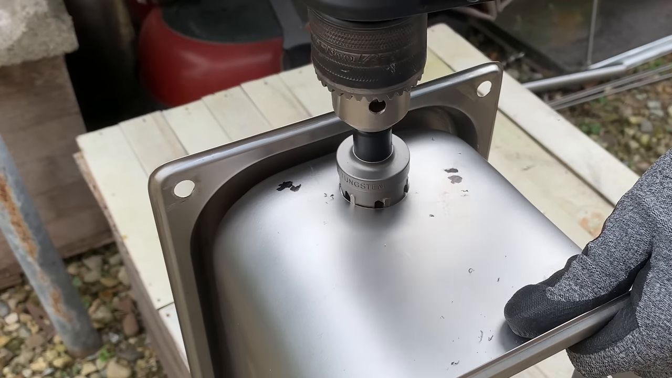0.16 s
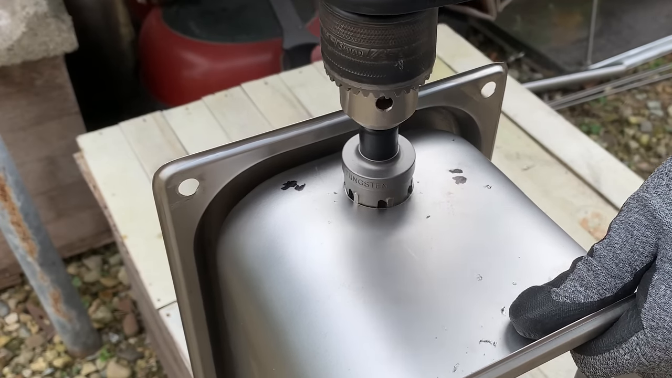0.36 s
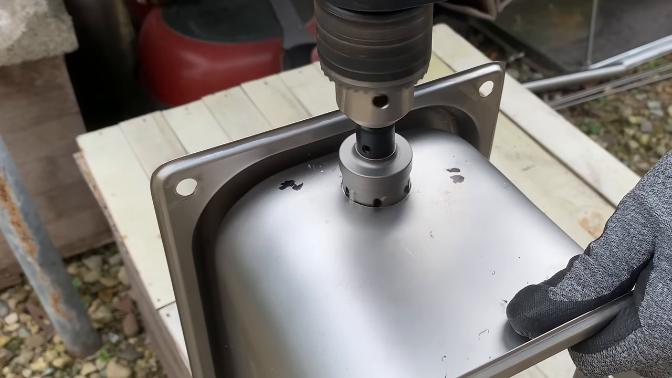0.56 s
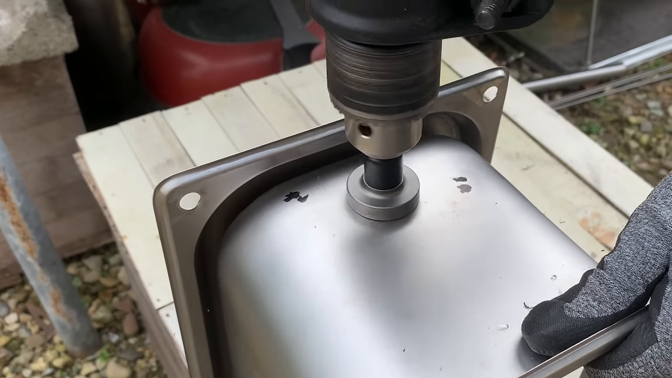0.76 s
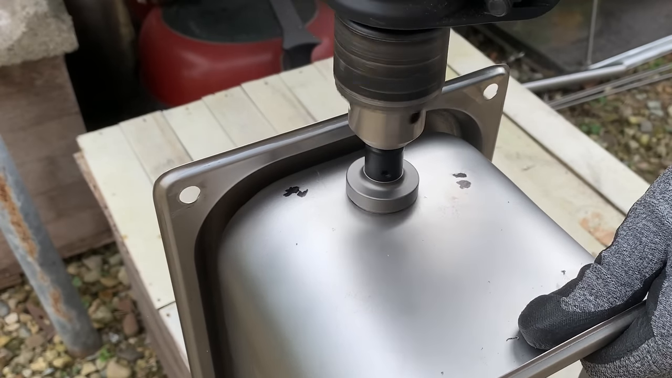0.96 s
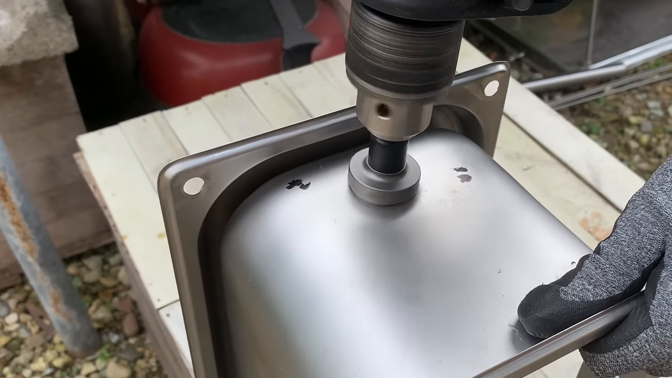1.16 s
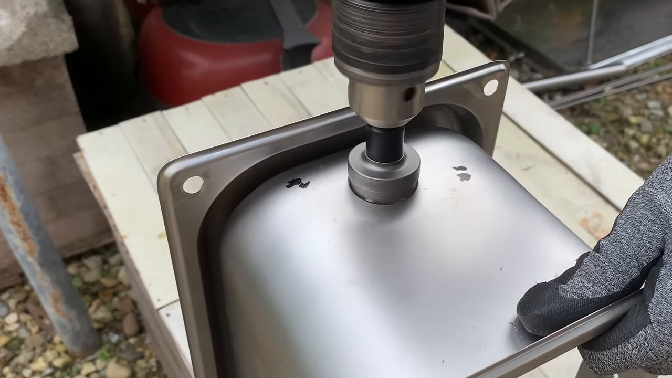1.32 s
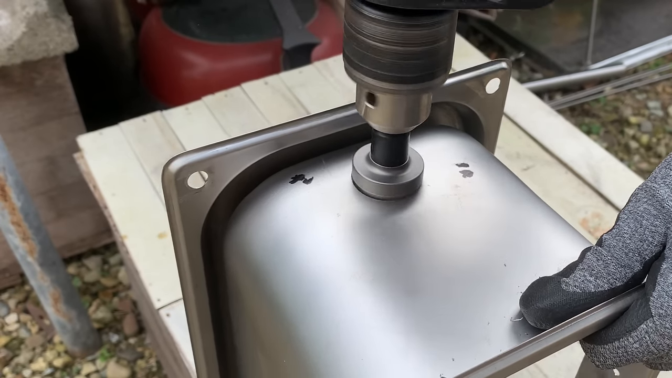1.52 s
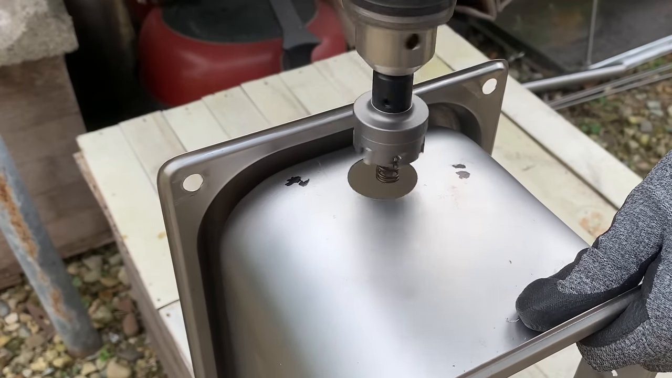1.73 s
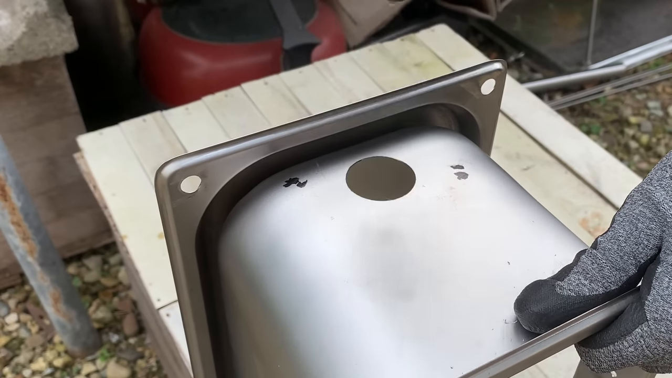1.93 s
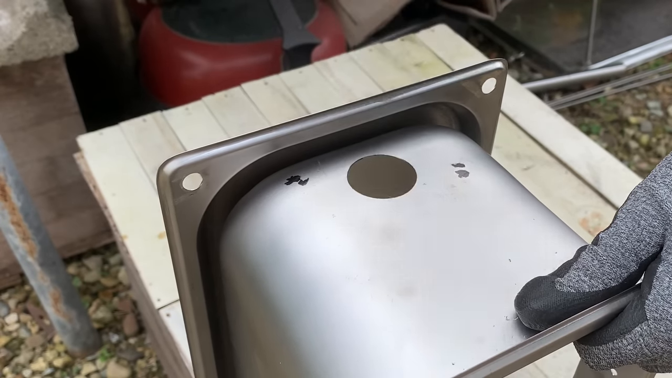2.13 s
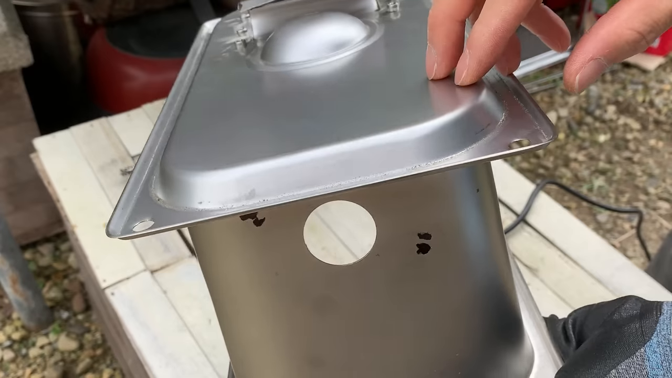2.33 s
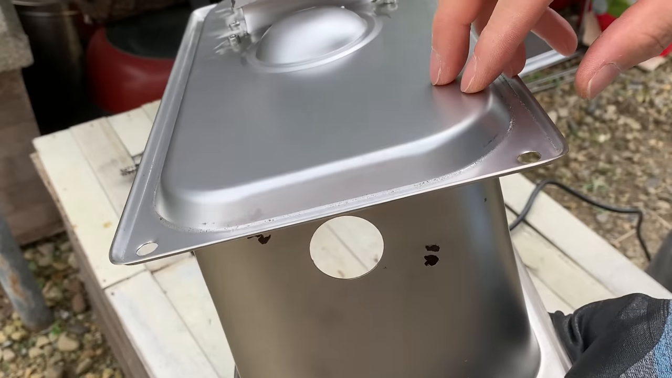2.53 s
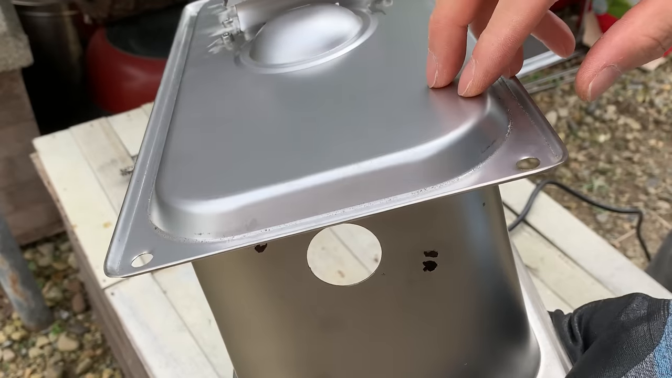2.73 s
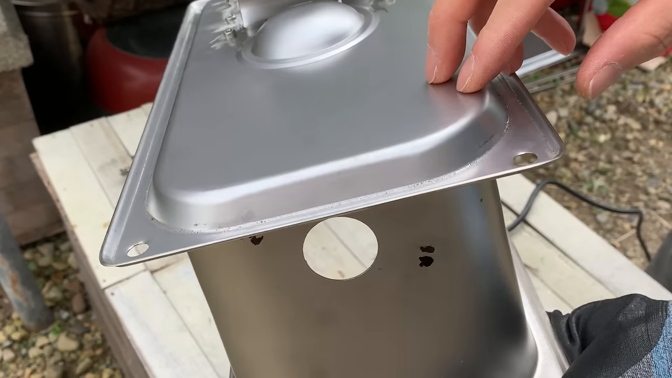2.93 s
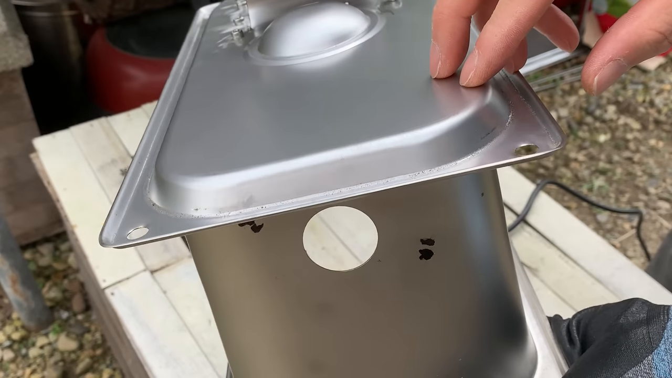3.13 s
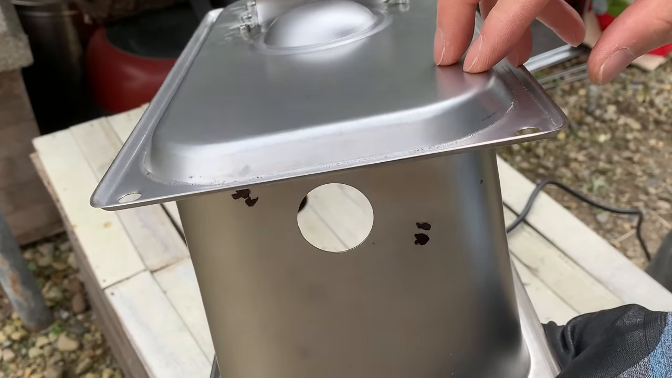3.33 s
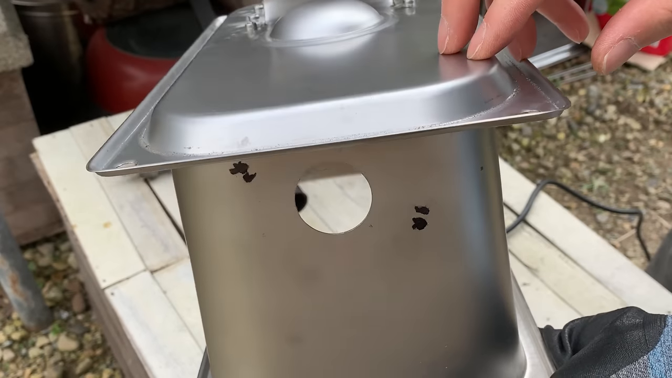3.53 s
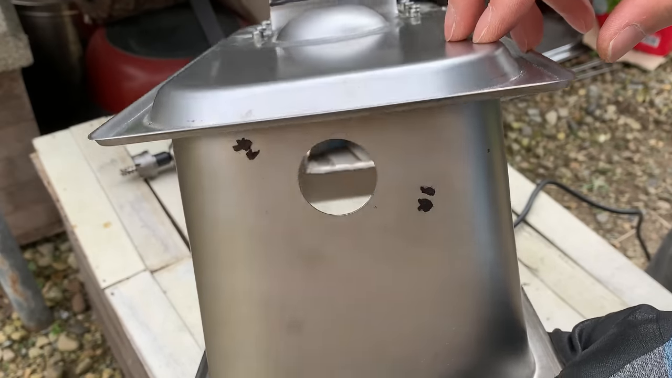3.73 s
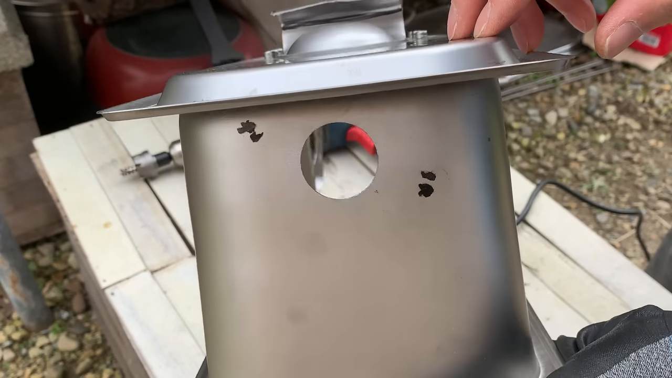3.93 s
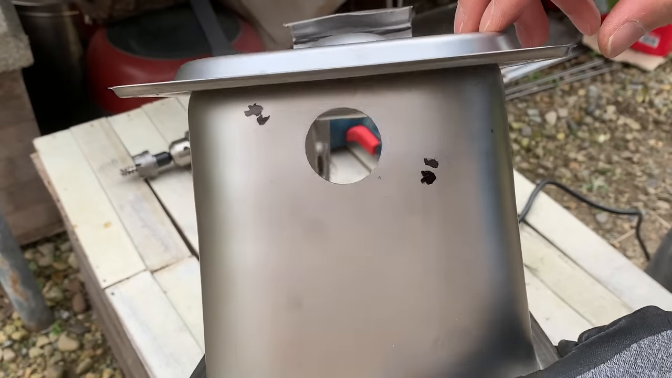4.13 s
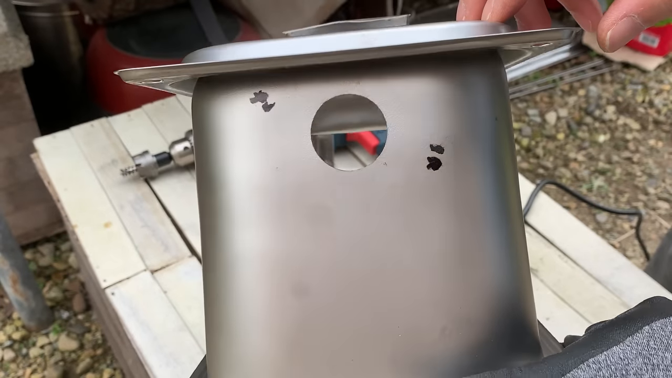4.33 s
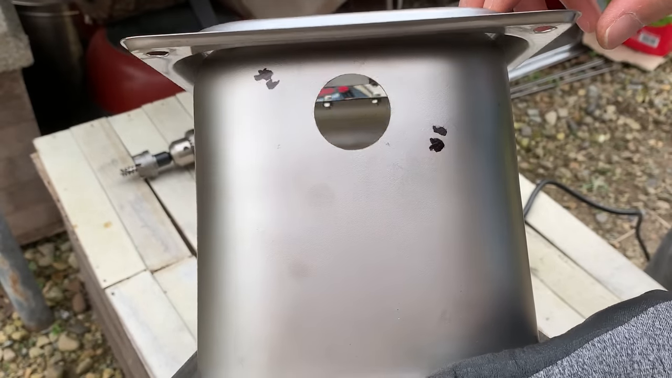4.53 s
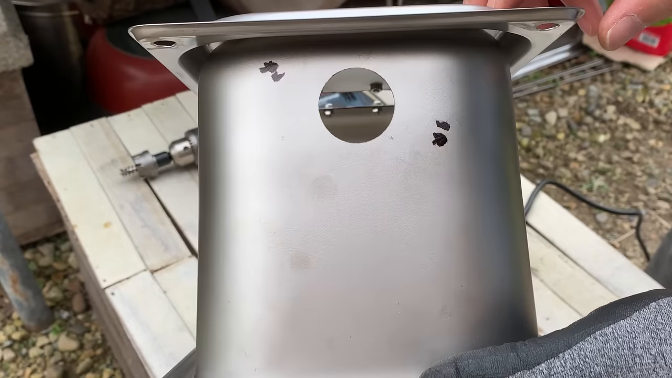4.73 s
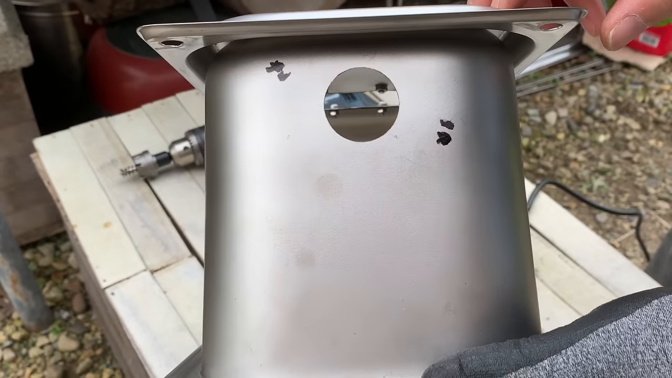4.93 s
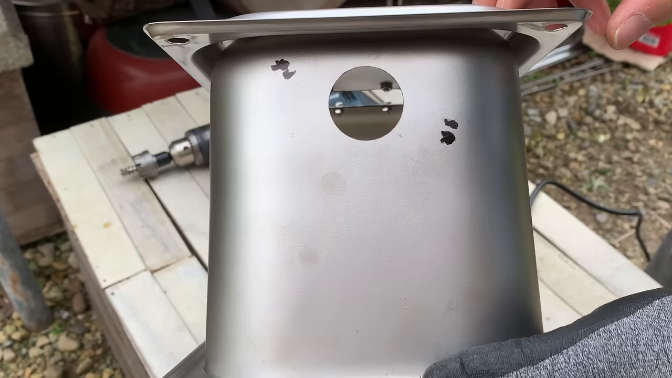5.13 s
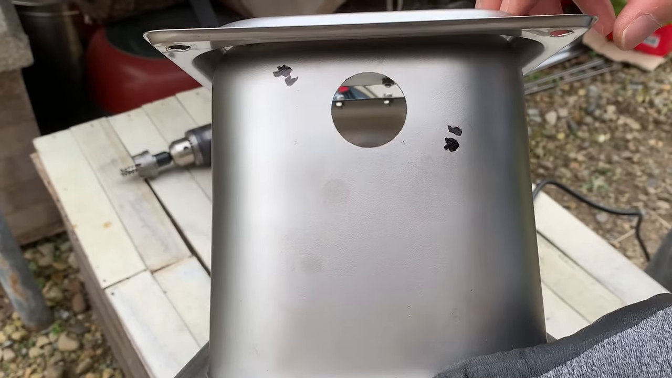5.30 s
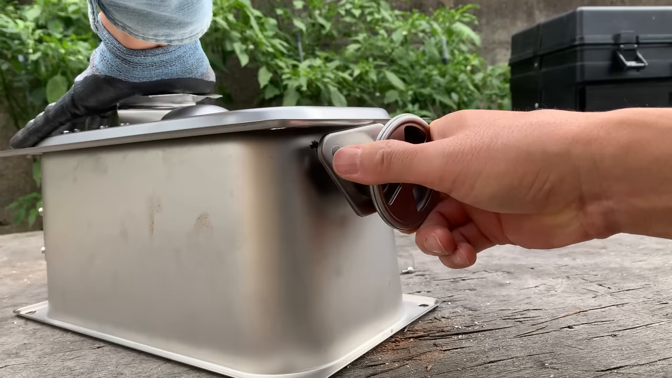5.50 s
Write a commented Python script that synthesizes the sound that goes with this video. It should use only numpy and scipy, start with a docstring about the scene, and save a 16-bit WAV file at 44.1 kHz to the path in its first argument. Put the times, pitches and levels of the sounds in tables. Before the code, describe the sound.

Harsh drill cutting of a sheet-metal pan with ringing tooth bites, an abrupt cut to faint birdsong and wind, and a late metal clank.

```python
"""A hole saw bites and chatters through the thin steel wall of an upturned pan, breaks through, spins in the
hole and is pulled out while the motor runs down; a jump to a quiet yard has birds, hum, wind and a last knock.
Random tooth contacts shake sheet resonances and scrape as coloured grains; the motor is hiss, gliding tones and
a housing resonance. The yard is coloured noise, the hum a narrow resonance, the birds gliding sines, the wind
low noise with decaying sine puffs; the fitting strikes the modes of the free-standing pan."""
import sys
import numpy as np
from scipy import signal
from scipy.fft import rfft, irfft
from scipy.io import wavfile

SR = 44100
rng = np.random.default_rng(int(sys.argv[2]) if len(sys.argv) > 2 else 0)


def convert_level_to_amplitude(level_db):
    """Map a level in decibels to its linear amplitude factor."""
    exponent = np.asarray(level_db, float) / 20
    return 10 ** exponent


def int16_out(signal):
    """Quantize to a 16-bit WAV file."""
    q = np.round(np.clip(np.atleast_2d(signal).T, -1, 1) * 32767)
    wavfile.write(sys.argv[1], SR, q.astype(np.int16))


N = 245195


def rms_one(x):
    """Scale to unit rms."""
    return x / np.sqrt(np.mean(x ** 2) + 1e-20)


def in_time(rows):
    """Read table columns as curves over time, one value a sample."""
    s, *columns = np.transpose(rows)
    return [np.interp(np.arange(N) / SR, s, column) for column in columns]


def at_hz(points):
    """Read a (frequency, value) table on the FFT grid, along a log frequency axis."""
    hz, value = np.transpose(points)
    return np.interp(np.log(np.fft.rfftfreq(N, 1 / SR) + 1), np.log(hz + 1), value)


def colour(x, spectrum):
    """Filter by a spectrum; rms 1."""
    return rms_one(irfft(rfft(x) * convert_level_to_amplitude(at_hz(spectrum)), N))


def filtered(x, order, hz, kind):
    """Butterworth filter."""
    return signal.sosfilt(signal.butter(order, hz, kind, fs=SR, output="sos"), x)


def drift(rate_hz):
    """Slow random wander of rms 1: noise through a two-pole lowpass."""
    r = np.exp(-2 * np.pi * rate_hz / SR)
    noise = rng.standard_normal(N + SR)
    settled = signal.lfilter([1], [1, -2 * r, r * r], noise)[SR:]
    return rms_one(settled)


def resonance(x, hz, width_hz):
    """Two-pole resonance with gain 1 on top."""
    r = np.exp(-np.pi * width_hz / SR)
    poles = [1, -2 * r * np.cos(2 * np.pi * hz / SR), r * r]
    return signal.lfilter([(1 - r * r) / 2, 0, (r * r - 1) / 2], poles, x + 1e-18)


def bursts(rows, rise_s):
    """Envelope of (time [s], level [dB], t60 [s]) events: quick rise, exponential fall."""
    t, out = np.arange(N) / SR, np.zeros(N)
    for s, level_db, t60 in rows:
        age = np.maximum(t - s, 0)
        fall = convert_level_to_amplitude(level_db - 60 * np.minimum(age / t60, 3))
        out += fall * (1 - np.exp(-age / rise_s))
    return out


def grains(per_s, spread_db):
    """Random clicks of uneven size and either sign; rms 1."""
    sizes = convert_level_to_amplitude(spread_db * np.minimum(rng.exponential(1, N), 5)) * rng.choice([-1, 1], N)
    return rms_one(sizes * (rng.random(N) < per_s / SR))


def patchy(x, patchy_db):
    """Each half octave swells on its own."""
    half_octave = 2 * np.log2(np.fft.rfftfreq(N, 1 / SR) / 300 + 0.0011)
    half_octave, spectrum = np.clip(half_octave, 0, 11), rfft(x)
    out = np.zeros(N)
    for k in range(12):
        band = irfft(spectrum * np.clip(1 - abs(half_octave - k), 0, 1), N)
        out += convert_level_to_amplitude(patchy_db * drift(17)) * band
    return out


def echoes(x, t60, dry_db):
    """Walls around the yard: a separate decaying noise response for each port."""
    t = np.arange(int(.5 * SR)) / SR
    tails = rng.standard_normal((2, len(t))) * convert_level_to_amplitude(-60 * t / t60) * (t > .003)
    tails /= np.sqrt(np.sum(tails ** 2, axis=1, keepdims=True))
    return convert_level_to_amplitude(dry_db) * x + signal.fftconvolve(x[None], tails, axes=1)[:, :N]


def at_ports(x, lead_s, wet_db):
    """A near source reaches one port before the other; nearby surfaces return mostly the middle range."""
    half_leads = np.array([[1], [-1]]) * lead_s / 2
    spin = np.exp(2j * np.pi * np.fft.rfftfreq(N, 1 / SR) * half_leads)
    middle = filtered(x, 2, [1600, 6000], "band")
    direct = irfft(rfft(x) * spin, N)
    return direct + convert_level_to_amplitude(wet_db) * echoes(middle + 0.28 * x, t60=.1, dry_db=-37)


# spectral tilt of the yard's air: (frequency [Hz], relative density [dB per Hz])
AIR_SPECTRUM = [(18, -41), (30, -21), (59, 4), (129, -2.5), (267, -18.5), (567, -28), (2920, -37.5),
                (4650, -28.5), (7060, -47), (15000, -63.5)]


def yard():
    """Far rumble and hiss with a wavering hum; alike at both ports only in the bass."""
    mid, side = rng.standard_normal((2, N))
    side = filtered(side, 1, 350, "high")
    mid = filtered(mid, 1, 2500, "low") + 0.9 * mid
    air = np.array([colour(mid + side, AIR_SPECTRUM), colour(mid - side, AIR_SPECTRUM)])
    hum = rms_one(resonance(rng.standard_normal(N), hz=133, width_hz=2.7))
    return convert_level_to_amplitude(-59.5) * air + convert_level_to_amplitude(-69) * hum


# strength of the lumpy wind, before trim: (time [s], level [dB])
WIND_LEVEL = [(2.3, -75), (2.45, -67.5), (5.56, -51)]
# single puffs on the microphone, before trim: (time [s], level [dB], swing frequency [Hz])
WIND_PUFFS = [(4.094, -36, 82), (4.127, -35.5, 69.4), (4.547, -50.5, 49.5), (4.597, -49, 57),
              (4.98, -39, 64.6), (5.02, -35.5, 90), (5.058, -40, 72), (5.118, -43.5, 121), (5.25, -49, 93)]


def wind():
    """Lumpy low noise and single puffs that swing the diaphragm as decaying sines."""
    low = filtered(rng.standard_normal((2, N)), 2, [35, 130], "band")
    stereo = rms_one(low[0] + 0.6 * low[1] * np.array([[1], [-1]]))
    lumps = convert_level_to_amplitude(in_time(WIND_LEVEL)[0] - 8 + 1.0 * drift(28)) * stereo
    t, puffs = np.arange(N) / SR, np.zeros(N)
    for s, level_db, hz in WIND_PUFFS:
        swing = np.sin(2 * np.pi * hz * (t - s))
        puffs += bursts([(s, level_db + 9, .1)], rise_s=0.0019) * swing
    return lumps + puffs


# far bird notes, before trim and echo:
# (time [s], length [s], start pitch [Hz], end pitch [Hz], level [dB])
BIRD_NOTES = [(2.422, 0.13, 3530, 4200, -86), (2.575, .06, 3330, 2900, -75.5),
              (2.675, 0.084, 5400, 4050, -74.5), (2.738, 0.099, 4280, 2810, -72),
              (2.948, .14, 4570, 4400, -85.5), (3.211, 0.057, 6620, 3200, -73.5),
              (3.299, 0.2, 4000, 2800, -81.5), (3.39, .05, 6900, 7650, -83),
              (3.43, 0.05, 6980, 4690, -66.5), (3.55, 0.046, 6630, 7860, -80),
              (3.604, 0.048, 6560, 4930, -61.5), (3.72, 0.07, 4600, 3000, -68.5),
              (3.801, 0.048, 4900, 3000, -70), (3.904, 0.034, 4400, 2600, -71.5),
              (4.294, 0.1, 4000, 2700, -77), (4.495, 0.075, 2800, 3900, -75.5),
              (4.575, 0.17, 6000, 4300, -75), (4.637, 0.034, 4690, 3170, -63)]


def birds():
    """Gliding whistles made hoarse by fast pitch wander and blurred by distance."""
    out = np.zeros(N)
    hoarse = .05 * drift(300)
    for s, length_s, start_hz, end_hz, level_db in BIRD_NOTES:
        i, u = int(s * SR), np.linspace(0, 1, int(length_s * SR))
        note = slice(i, i + len(u))
        pitch = (start_hz + (end_hz - start_hz) * u) * (1 + hoarse[note])
        swell = np.sin(np.pi * u) ** .5
        out[note] += convert_level_to_amplitude(level_db + 7) * swell * np.sin(2 * np.pi * np.cumsum(pitch) / SR)
    return echoes(out, t60=.32, dry_db=-6)


def ring(clicks, hz, t60):
    """A unit click sets a decaying sine ringing from height 1."""
    r, w = convert_level_to_amplitude(-60 / (t60 * SR)), 2 * np.pi * hz / SR
    return signal.lfilter([0, np.sin(w)], [1, -2 * r * np.cos(w), r * r], clicks + 1e-18)


# the knock, before trim: (time [s], level [dB])
FITTING_KNOCK = [(5.417, -20.5)]
# modes of the free-standing pan: (frequency [Hz], relative level [dB], t60 before the cap [s])
PAN_MODES = [(366, -16, 5.0), (484, -14, 0.45), (743, -7.5, 0.48), (1165, -7.5, 0.18), (1363, -20, 5.0),
             (1729, -14, 0.29), (1760, -6.5, 0.31), (2364, -18, 0.27), (2960, -4, 0.1), (3140, -0.5, 0.019),
             (3620, -8, 0.076), (3828, -5.5, 0.17), (4200, -15, 0.3), (4587, -25, 2.2), (4910, -19, 5.0),
             (5028, 7, 0.045), (5096, -10.5, 0.1), (5346, -31, 0.19), (5814, -24, 0.2)]
# clatter of metal on metal: (frequency [Hz], relative density [dB per Hz])
CLATTER_SPECTRUM = [(120, -31), (200, -11.5), (1020, -22.5), (1780, -9), (5170, -15.5), (15000, -31)]


def fitting():
    """A metal fitting hits the pan: a few bounces into its modes and a dying clatter."""
    s, level_db = FITTING_KNOCK[0]
    bounces = [(s, level_db, .05), (s + .025, level_db - 15, .05), (s + .033, level_db - 14, .07)]
    hits = bursts(bounces, rise_s=.00003)
    blow = np.maximum(np.diff(hits, prepend=0), 0)  # each bounce is a sharp push
    rings = sum(convert_level_to_amplitude(mode_db) * ring(blow, hz, min(t60, .25)) for hz, mode_db, t60 in PAN_MODES)
    clatter_env = convert_level_to_amplitude(-11) * hits + bursts([(s, level_db - 21, .3)], rise_s=0.0019)
    clatter = colour(rng.standard_normal(N), CLATTER_SPECTRUM) * clatter_env
    return convert_level_to_amplitude(-11) * rings + clatter


# course of the cut, before trims: (time [s], sheet chatter level [dB], tooth grind level [dB],
# motor hiss level [dB], bench rumble level [dB])
CUT_LEVELS = [(0, -25, -23, -35.5, -51), (0.06, -34.5, -40, -44, -45), (0.12, -34, -50, -52.5, -57),
              (0.16, -41.5, -61.5, -67, -53), (0.26, -45.5, -54, -60.5, -47.5),
              (0.33, -52.5, -59, -71, -47.5), (0.43, -44.5, -60, -62.5, -45.5),
              (0.49, -34, -42.5, -49.5, -56.5), (0.55, -33, -41.5, -45.5, -50.5),
              (0.62, -29.5, -31, -37.5, -52), (0.68, -29, -35.5, -42, -48), (0.72, -40.5, -37, -44.5, -44),
              (0.79, -43.5, -43, -37, -55), (0.86, -41.5, -40.5, -40, -63), (0.95, -45, -35.5, -36.5, -69),
              (1.05, -55, -34.5, -38, -64), (1.15, -58.5, -37, -37, -65.6),
              (1.25, -72, -44.5, -43.5, -60.5), (1.33, -67.5, -42, -43.5, -58),
              (1.4, -49.5, -43, -43.5, -62), (1.46, -41.5, -38, -40.5, -61), (1.53, -55, -46.5, -44, -60),
              (1.59, -81, -46.5, -39, -69), (1.64, -47, -42.5, -42, -61.0),
              (1.72, -56.9, -47.5, -51.5, -54.5), (1.95, -59.5, -54.5, -53.5, -64.5),
              (2.15, -65, -53, -62.5, -71.5), (2.28, -77.5, -56.5, -68.5, -69)]


def cut_levels():
    """Chatter, grind, hiss and rumble fader curves, following how the saw meets the steel."""
    return in_time(CUT_LEVELS)


# brush and fan noise: (frequency [Hz], relative density [dB per Hz])
HISS_SPECTRUM = [(150, -40), (250, -15.5), (680, -18), (741, -18), (1060, -11.5), (1200, -13),
                 (3320, -16.5), (7100, -15), (9350, -7), (11500, -23.5), (12800, -16), (15400, -23)]
# motor whine, before wander: (time [s], pitch [Hz], level [dB])
MOTOR_WHINE = [(1.18, 9600, -80), (1.26, 10050, -52), (1.33, 10400, -72), (1.58, 10400, -72),
               (1.61, 10250, -45), (1.85, 8130, -54), (2.0, 7030, -62), (2.28, 5360, -65)]
# gear tones: (multiple of the gear pitch, level against the whine [dB])
GEAR_TONES = [(1, -4), (3, -6), (4, -3)]
# drill body resonance: (frequency [Hz], width [Hz], level [dB])
HOUSING_RING = (895, 14, -58.5)


def motor():
    """Brush and fan hiss, a whine with gear tones, and the ringing housing."""
    _, _, hiss_db, _ = cut_levels()
    hiss_gain = convert_level_to_amplitude(hiss_db + 5.0 + 0.82 * drift(20))
    hiss = hiss_gain * colour(rng.standard_normal(N), HISS_SPECTRUM)

    # straight lines in log pitch: speed dies away exponentially
    log_pitch, whine_db = in_time([(s, np.log(hz), level_db) for s, hz, level_db in MOTOR_WHINE])
    phase = 2 * np.pi * np.cumsum(np.exp(log_pitch + .001 * drift(60))) / SR
    gear_phase = .62 * phase
    gear = sum(convert_level_to_amplitude(level_db) * np.sin(k * gear_phase) for k, level_db in GEAR_TONES)
    whine = convert_level_to_amplitude(whine_db + 1.5 * drift(30)) * (np.sin(phase) + gear)

    hz, width_hz, level_db = HOUSING_RING
    housing = convert_level_to_amplitude(level_db) * rms_one(resonance(rng.standard_normal(N), hz, width_hz))
    return hiss + whine + housing


# modes of the held sheet: (frequency [Hz], width before scaling [Hz], relative level [dB])
SHEET_MODES = [(602, 20, -7), (639.5, 14, 5), (728, 30, -3.5), (817, 16, -11), (1095, 60, -15),
               (1246, 25, -13), (1330, 40, -17.5), (1770, 60, -20), (1880, 100, -11.5), (2280, 100, -20),
               (2480, 90, -16)]


def sheet(force, width_scale):
    """The held sheet rings in its modes under a force, with alternating sign."""
    out = np.zeros(N)
    for k, (hz, width_hz, level_db) in enumerate(SHEET_MODES):
        out += (-1) ** k * convert_level_to_amplitude(level_db) * resonance(force, hz, width_hz * width_scale)
    return out


# teeth and rim against steel: (frequency [Hz], relative density [dB per Hz])
GRIND_SPECTRUM = [(150, -48), (250, -13), (754, 0), (836, -1), (7100, -9.5), (9350, -9), (10900, -11.5),
                  (11500, -25.5), (12500, -9.5), (15400, -14)]


def grind_colour(x):
    """Give noise or grains the bright spectrum of steel scraping steel; rms 1."""
    return colour(x, GRIND_SPECTRUM)


# saw knocking the rim of the hole, before trims: (time [s], level [dB], ring share [dB])
RIM_KNOCKS = [(0.2014, -21, -6), (0.2334, -23.5, -8), (0.4025, -32, -6), (0.6828, -7.5, -5.5),
              (0.7194, -25, -10), (1.6526, -13.5, -2.5)]


def knocks():
    """Each knock is a short crack that also sets the sheet ringing."""
    white = rng.standard_normal(N)
    crack_rows = [(s, level_db - 6, .05) for s, level_db, _ in RIM_KNOCKS]
    crack = grind_colour(white) * bursts(crack_rows, rise_s=0.00013)
    blow_rows = [(s, level_db + ring_db, .03) for s, level_db, ring_db in RIM_KNOCKS]
    blow = white * bursts(blow_rows, rise_s=.001)
    rim = convert_level_to_amplitude(16) * resonance(blow, hz=1048, width_hz=60)
    return crack + rim + convert_level_to_amplitude(-1.5) * sheet(blow, width_scale=0.87)


# teeth catching hard in the sheet, before trims: (time [s], level [dB])
TOOTH_BITES = [(0.004, -10), (0.039, -27.5), (0.087, -10), (0.504, -14.5), (0.529, -15), (0.572, -0.5),
               (0.592, -9), (0.624, -16.5), (0.654, -13.5), (0.684, -30.5)]
# saw dragging low in the hole: (time [s], level [dB], t60 [s])
HOLE_RUB = (1.41, -29, 0.44)


def saw():
    """Tooth contacts shake the sheet, scrape the rim and rumble in the bench."""
    chatter_db, grind_db, _, rumble_db = cut_levels()
    bites = bursts([(s, level_db, .12) for s, level_db in TOOTH_BITES], rise_s=0.001)

    teeth = grains(per_s=2500, spread_db=4.0)
    gain = np.std(sheet(teeth, width_scale=1.0))
    force = teeth * (convert_level_to_amplitude(chatter_db + 1.0) + convert_level_to_amplitude(-15) * bites)
    chatter = sheet(force, width_scale=0.77) / gain
    chatter = filtered(chatter, 3, 520, "high")  # the small sheet radiates no bass

    scrape = patchy(grind_colour(grains(per_s=9900, spread_db=4.0)), patchy_db=1.5)
    scrape = scrape * (convert_level_to_amplitude(grind_db + 3.7 * drift(25)) + convert_level_to_amplitude(-14) * bites)

    bench_noise, drag_noise = rng.standard_normal((2, N))
    bench = filtered(bench_noise, 3, [55, 200], "band")
    bench = bench + convert_level_to_amplitude(5) * resonance(bench_noise, hz=174, width_hz=6.8)
    rumble = convert_level_to_amplitude(rumble_db + 1.4) * rms_one(bench)

    drag = rms_one(filtered(drag_noise, 2, [150, 1100], "band"))
    drag = drag * bursts([HOLE_RUB], rise_s=0.017)
    return chatter + scrape + rumble + drag


# lead of the left port: (sheet [s], motor [s], standing pan [s])
PORT_LEADS = (102e-6, -88e-6, 20e-6)


def scene():
    """The drill until the jump, then the quiet yard."""
    jump_s, fade_s = 2.283, 0.0012
    sheet_lead, motor_lead, pan_lead = PORT_LEADS
    drilling = np.clip((jump_s - np.arange(N) / SR) / fade_s, 0, 1)
    quiet = yard() + wind() + birds() + at_ports(fitting(), pan_lead, wet_db=-3.5)
    drill = at_ports(motor(), motor_lead, wet_db=0.0)
    drill = drill + at_ports(saw() + knocks(), sheet_lead, wet_db=-1.5)
    return drilling * drill + (1 - drilling) * quiet


def top_cut(x):
    """Nothing passes above the cut-off."""
    return signal.sosfilt(signal.butter(12, 15570, fs=SR, output="sos"), x)


def record(dry):
    """Peaks are rounded by soft saturation and a narrow stretch of the treble is notched out."""
    rounded = 0.51 * np.tanh(dry / 0.57)
    gap = signal.cheby2(4, 40, [11250, 11950], "stop", fs=SR, output="sos")
    mix = signal.sosfilt(gap, rounded)
    return top_cut(mix)


dry = scene()
out = record(dry)
int16_out(out)
```